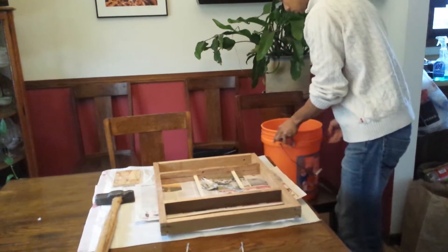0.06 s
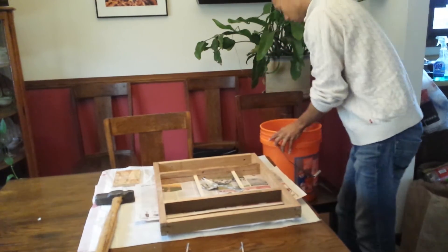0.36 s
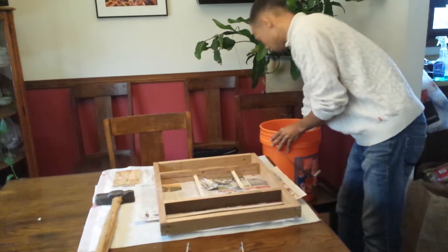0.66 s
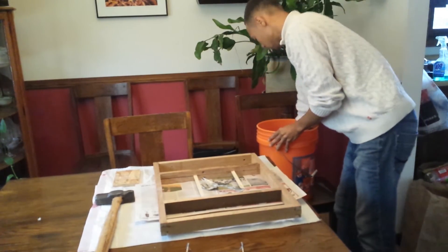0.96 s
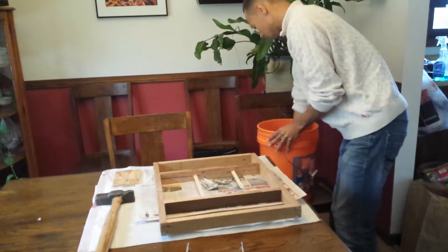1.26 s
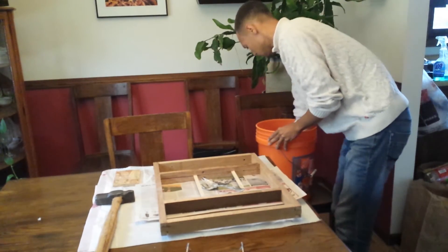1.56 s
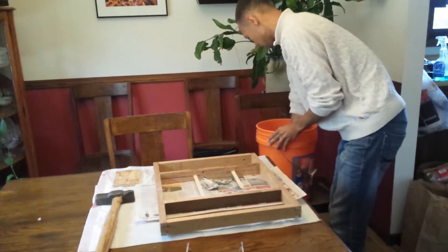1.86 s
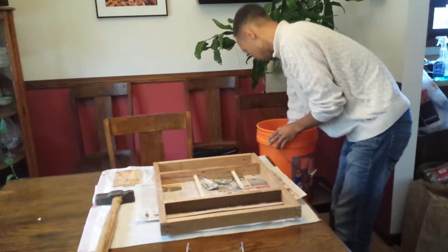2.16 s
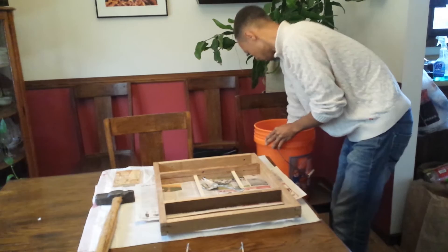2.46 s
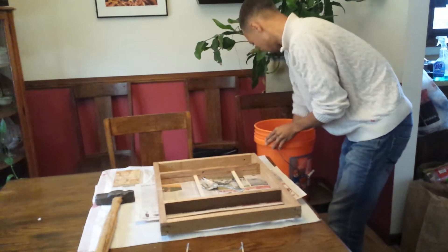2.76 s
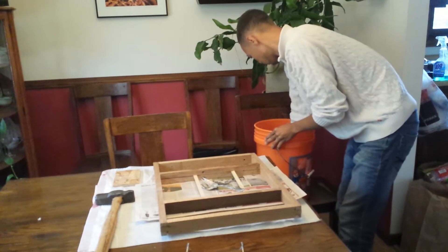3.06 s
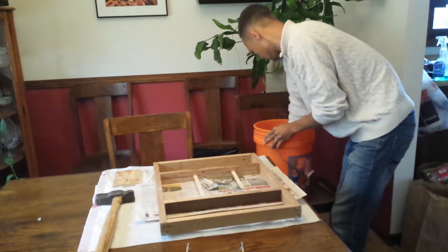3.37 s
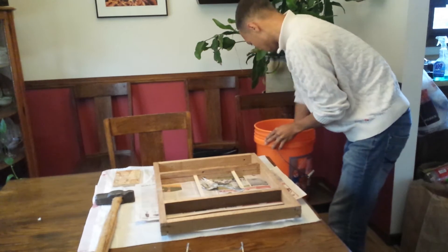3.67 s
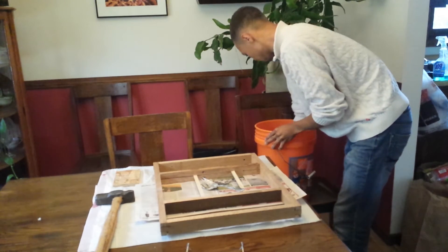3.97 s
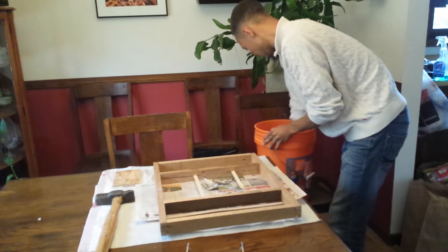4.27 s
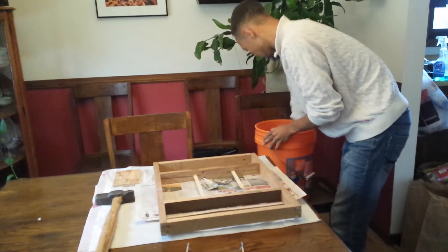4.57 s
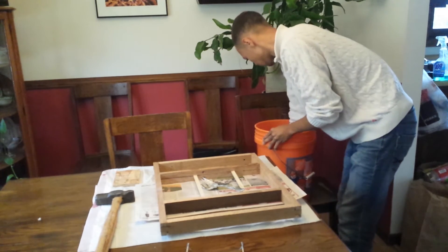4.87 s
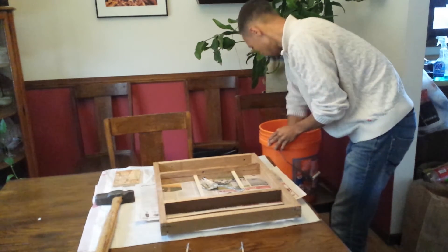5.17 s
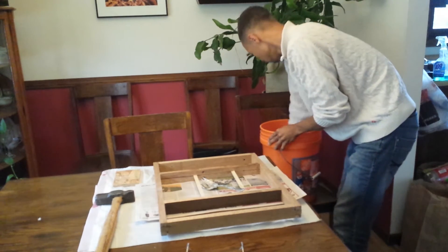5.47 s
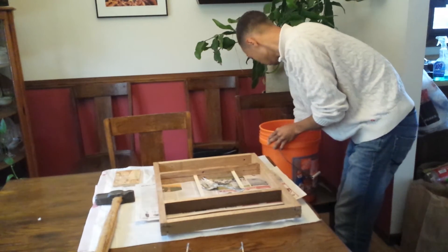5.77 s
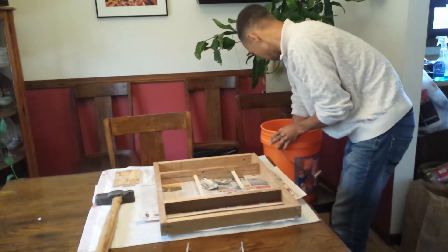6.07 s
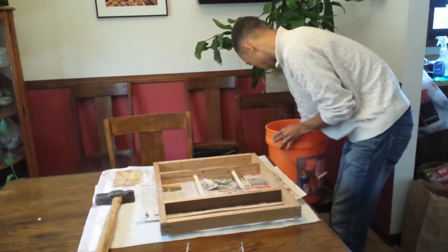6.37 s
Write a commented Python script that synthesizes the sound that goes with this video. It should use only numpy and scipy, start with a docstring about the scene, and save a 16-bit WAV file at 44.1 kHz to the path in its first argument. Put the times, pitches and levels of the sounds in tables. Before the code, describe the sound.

A plastic bucket judders briefly across a surface and lands with a hollow thump, the damp sugar inside slumping. A hand then digs in and sweeps round again and again, making soft gritty hisses, scrapes and small crunches. Now and then the bucket rocks and knocks, more often near the end. It is heard from a few metres away in a quiet room with a slight echo.

```python
"""In a wood-panelled room, a few metres away, damp sugar is mixed by hand in a plastic bucket.
The bucket judders along its seat and is set down; then the hand digs in and sweeps round, again and again.
Thousands of tiny grain clicks blur into a hiss, a scrape or a crunch.
Now and then the bucket rocks and knocks, ringing briefly. The room adds its echo and a faint rumble."""
import sys
import numpy as np
from scipy import signal
from scipy.fft import rfft, irfft
from scipy.io import wavfile
from scipy.ndimage import uniform_filter1d

SR = 44100
rng = np.random.default_rng(int(sys.argv[2]) if len(sys.argv) > 2 else 0)


def put_to_file(sound):
    """Save the sound as 16-bit audio at rate SR, in the file named by the first command-line argument."""
    columns = np.atleast_2d(sound).T  # one column per channel
    safe = np.clip(columns, -1, 1)
    whole_steps = np.round(safe * 32767)
    wavfile.write(sys.argv[1], SR, whole_steps.astype(np.int16))


N = 291501
TIME = np.arange(N) / SR

# the fingers plunge in or crush a clump: t/s, relative level/dB, length/s, treble cutoff/Hz
DIGS = [(0.652, -38, 0.038, 2000), (0.929, -41.5, 0.058, 3220), (1.04, -37, 0.021, 7000),
        (1.379, -46.5, 0.033, 1640), (1.533, -32.5, .03, 1860), (2.299, -30.5, 0.037, 1680),
        (3.057, -37, 0.03, 1690), (3.272, -42, 0.031, 1100), (3.873, -39.5, 0.049, 2320),
        (3.91, -35, 0.014, 1510), (4.057, -44.5, 0.016, 6000), (4.782, -37.5, 0.047, 1600),
        (4.799, -32, 0.028, 2200), (5.649, -34, 0.039, 1297), (5.802, -38, 0.014, 3000),
        (6.336, -34.5, 0.034, 1740)]
# the bright tone of loose, sliding grains: f/Hz, level/dB
HISS_TONE = [(200, -52), (900, -1.5), (2000, 0), (3000, 1.5), (3800, 0), (5500, -0.5), (7400, -2.5),
             (8400, -7), (10000, -15), (13000, -19), (15000, -28)]
# the darker tone of packed grains scraping: f/Hz, level/dB
SCRAPE_TONE = [(60, -8), (110, -10), (145, -3), (220, -1), (420, -1), (650, 1), (900, -1.5), (1300, 3),
               (1750, 2), (2650, -5), (3030, 2.5), (3450, -8.5), (9000, -38)]


def stirring():
    """Each sweep of the hand sets loose grains hissing and drags packed sugar along the wall."""
    slide, press = hand_motion()
    hiss = unit(colour(grains(N, per_s=7000, scatter_db=5, clumps_per_s=70, clump_db=-0.5), HISS_TONE))
    packed = grains(N, per_s=2500, scatter_db=5.5, clumps_per_s=73, clump_db=-0.5)
    scrape = unit(colour(packed, SCRAPE_TONE))
    # grains scratching the plastic make the wall ring at one pitch, even under a light touch
    scratches = grains(N, per_s=3000, scatter_db=4, clumps_per_s=40, clump_db=2)
    wall = unit(resonate(scratches, hz=3040, sharpness=14))
    return undb(3) * slide * hiss + undb(2.5) * press * scrape + undb(-35.5) * np.sqrt(slide) * wall


def hand_motion():
    """How strongly grains slide and packed sugar is pressed: sweeps swell and fade, digs start at once."""
    # strokes through the sugar: t/s, swell/s, fade/s, relative hiss level/dB, relative scrape level/dB
    sweeps = [(0.649, 0.049, 0.16, -46.5, -43), (0.819, 0.11, 0.37, -48, -57),
              (1.129, 0.13, 0.31, -48.5, -46), (1.38, 0.18, .1, -49, -42), (1.57, 0.17, 0.14, -40.5, -40),
              (1.79, 0.12, 0.24, -36.5, -44), (1.98, 0.15, 0.13, -48, -43), (2.33, 0.064, 0.38, -45, -46.5),
              (2.56, 0.15, 0.13, -42, -48.5), (2.749, 0.088, .13, -41.5, -47), (3.16, 0.12, .13, -46, -56),
              (3.341, 0.33, 0.14, -40.5, -58), (3.848, 0.045, 0.33, -44.5, -61),
              (4.08, 0.16, 0.15, -47.5, -53), (4.42, 0.14, 0.8, -55, -53), (4.82, 0.092, 0.32, -44.5, -57),
              (4.98, 0.19, 0.43, -43, -51), (5.42, 0.063, .14, -50, -45), (5.71, 0.086, 0.27, -41.5, -47),
              (5.86, 0.19, 0.21, -41, -48.5), (6.32, 0.084, 0.19, -43, -42.5), (6.47, 0.12, .1, -46.5, -41)]
    hand_in_s, idle_hiss_db, idle_scrape_db = 0.88, -60.5, -57.5  # once in, the hand never quite rests
    moves = [(TIME >= hand_in_s, idle_hiss_db, idle_scrape_db)]
    for start, rise, fall, hiss_db, scrape_db in sweeps:
        progress = np.interp(TIME, [start, start + rise, start + rise + fall], [0, 1, 2])
        speed = np.abs(np.sin(np.pi / 2 * progress)) ** 1.64  # a power above 1 starts and stops gently
        moves.append((speed, hiss_db, scrape_db))
    for start, db, _, _ in DIGS:
        spray = (TIME >= start) * np.exp(-np.abs(TIME - start) / 0.044)
        moves.append((spray, db - 10, db - 8))  # each dig sets off a little hiss and scrape
    slide = np.sqrt(sum((shape * undb(hiss_db)) ** 2 for shape, hiss_db, _ in moves))
    press = np.sqrt(sum((shape * undb(scrape_db)) ** 2 for shape, _, scrape_db in moves))
    return slide, press


def grains(n, per_s, scatter_db, clumps_per_s, clump_db):
    """Crystals slip one by one, mostly with small clicks; damp clumps give way in bunches."""
    slips = rng.random(n) < per_s / SR
    sizes = rng.standard_normal(n) * undb(scatter_db * np.minimum(rng.exponential(size=n), 5))
    return slips * sizes * undb(clump_db * wander(n, clumps_per_s))


def digging():
    """The fingers break into the heap, with one crunch for each dig."""
    out = np.zeros(N)
    for start, db, length, bright_hz in DIGS:
        add(out, start, undb(db) * crunch(length, bright_hz))
    return out


def crunch(length, bright_hz):
    """Packed sugar cracks, then collapses in a rush of grains; the bucket's hollow colours the sound."""
    # the tone of a breaking clump: f/Hz, level/dB
    crunch_tone = [(50, -24), (150, 7), (300, 0.5), (600, 3), (900, 5), (1250, 5.5), (1700, 4.5), (2400, 2),
                   (3100, 1.5), (5000, -10.5), (8000, -20), (14000, -36)]
    t = TIME[:SR // 4]
    slips = colour(grains(len(t), per_s=5000, scatter_db=1.5, clumps_per_s=380, clump_db=1), crunch_tone)
    hollow = resonate(slips, hz=870, sharpness=9) + resonate(slips, hz=1700, sharpness=12)
    crack = undb(-5.5) * np.exp(-t / 0.0089)
    collapse = np.exp(-(t / length) ** 4.6)  # holds, then drops away fast
    return undb(-2) * unit(soften(slips + undb(-5) * hollow, bright_hz)) * (crack + collapse)


def knocking():
    """Each blow rings the bucket and the room and jolts the sugar; returns the rings and the crunches."""
    # the bucket knocks on its seat: t/s, level/dB, treble cutoff/Hz (higher for a harder contact)
    knocks = [(.198, -34.5, 500), (0.2451, -14.5, 470), (.275, -22, 1200), (.296, -21.5, 500),
              (.304, -20, 950), (.328, -29.5, 307), (.859, -47, 220), (.901, -50, 128.1), (0.98, -46, 260),
              (1.537, -38.5, 601), (1.801, -40, 186), (2.071, -38, 302), (2.3, -38.5, 1600),
              (2.754, -49.5, 260), (3.655, -29, 410), (3.691, -41, 382), (4.267, -46.5, 300),
              (4.796, -39, 500), (5.066, -36.5, 280), (5.360, -27, 720), (5.448, -25, 484),
              (5.499, -35.5, 400), (5.795, -37, 222), (6.104, -28, 674), (6.163, -33.5, 242),
              (6.546, -39.5, 330)]
    # tones a knock sets ringing: the bucket's own, plus the room's low standing waves (63, 141, 341 Hz)
    # f/Hz, relative level/dB, time to fade 60 dB before ring_scale/s
    knock_tones = [(63.4, -13, 0.12), (89.5, -32, 0.2), (141.4, -19.5, 0.5), (195.7, -4, 0.11),
                   (222.2, 4.5, 0.057), (287, 0, 0.035), (316, -8, 0.09), (341.2, -8.5, 0.17),
                   (405, 6.5, 0.016), (515.3, -12.5, 0.14), (553, -8.5, 0.035), (611, -8, 0.12),
                   (681, -4.5, 0.075), (785, -9.5, 0.081), (864, -5.5, 0.082), (970, -7, 0.039),
                   (1053, -1.5, 0.064), (1102, -5.5, 0.079), (1242, -8, 0.047)]
    ring_scale, wall_rise_s = 0.73, 0.0038  # every ring is shortened; the wall is slow to start
    t = TIME[:SR * 2 // 5]
    rings, jolts = np.zeros((2, N)), np.zeros(N)
    hz, tone_db, ring_s = np.transpose(knock_tones)[:, :, None]
    fades = undb(tone_db) * np.exp(-np.log(1000) * t / (ring_s * ring_scale))
    for start, db, hard_hz in knocks:
        # the load and the grip shift, so each blow sounds a little different
        detune, share = rng.standard_normal((2, len(knock_tones), 1))
        tones = fades * undb(0.9 * share) * np.sin(2 * np.pi * hz * (1 + 0.0071 * detune) * t)
        ring = tones[::2].sum(0) - tones[1::2].sum(0)  # neighbouring tones swing opposite ways
        ring *= 1 - np.exp(-t / wall_rise_s)
        ring = soften(cut_bass(ring, 78), hard_hz)  # a small body gives off little deep bass
        echo = signal.fftconvolve(ring[None], reflections(decay_scale=0.7), axes=1)[:, :len(t)]
        heard = ring + undb(2) * echo
        add(rings, start, undb(db) * heard / heard[:, :SR // 30].std())  # the first 1/30 s sets the level
        add(jolts, start, undb(db - 11) * crunch(length=0.013, bright_hz=9000))
    return rings, jolts


def dragging():
    """The bucket is shoved into place, and later skids a little after two of the harder knocks."""
    # the foot sticks and slips: t/s, length/s, judder rate/Hz, judder level/dB, relative grit level/dB
    skids = [(0, 0.051, 340.5, -24, -38.5), (.05, 0.085, 370, -28.5, -43), (.135, .12, 372, -31, -41),
             (3.728, 0.051, 336, -40, -66), (5.512, 0.0687, 346.7, -35, -60)]
    out = np.zeros(N)
    for start, length, rate_hz, db, grit_db in skids:
        add(out, start, skid(length, rate_hz, db, grit_db))
    return out


def skid(length, rate_hz, db, grit_db):
    """The foot of the bucket judders unevenly as it slides; grit scrapes under it and the load shifts."""
    ramp_s, rise_hz_per_s = 0.0047, 126  # a skid takes hold and lets go; it speeds up on the way
    n = int(length * SR)
    t = TIME[:n]
    hz = rate_hz + rise_hz_per_s * (t - length / 2)
    phase = 2 * np.pi * np.cumsum(hz * (1 + .04 * wander(n, per_s=150))) / SR
    judder = np.sin(phase) * undb(db + 2.8 * wander(n, per_s=110))
    # sharper slips add overtones as the grit bites
    overtones = undb(-10) * np.sin(2 * phase) + undb(0.5) * np.sin(3 * phase)
    grit_clicks = grains(n, per_s=3000, scatter_db=3, clumps_per_s=110, clump_db=1.5)
    grit = unit(soften(colour(grit_clicks, SCRAPE_TONE), 1500))
    rumble = unit(soften(colour(rng.standard_normal(n), SCRAPE_TONE), 470))
    load = unit(colour(grains(n, per_s=6000, scatter_db=1.5, clumps_per_s=80, clump_db=1.5), HISS_TONE))
    rough = overtones + undb(-1) * grit + undb(6.5) * rumble + undb(-2.5) * load
    fade_in_out = np.sqrt(np.clip(np.minimum(t, length - t) / ramp_s, 0, 1))
    return (judder + rough * undb(grit_db)) * fade_in_out


def slumping(start):
    """The heap collapses as the bucket lands; thrown crystals patter on the wall a moment later."""
    t = TIME[:SR // 4]
    out = np.zeros(N)
    add(out, start, undb(-23) * crunch(length=0.056, bright_hz=10000))
    patter = unit(grains(len(t), per_s=4000, scatter_db=3, clumps_per_s=200, clump_db=1.5))
    add(out, start + .008, undb(-41) * patter * np.exp(-t / .05))
    return out


def settling(start):
    """Loose sugar trickles to rest after the bucket is set down."""
    t = TIME[:SR // 2]
    out = np.zeros(N)
    trickle = grains(len(t), per_s=4000, scatter_db=1.5, clumps_per_s=60, clump_db=1.5)
    add(out, start, undb(-35) * unit(colour(trickle, HISS_TONE)) * np.exp(-t / 0.11))
    return out


def room(x, direct_db, echo_db, decay_scale, spots):
    """Sound leaves from one or more spots round the bucket by turns, each with its own reflections."""
    active_spot = np.arange(N) // (SR // 60) % spots  # 60 turns a second
    echo = 0
    for spot in range(spots):
        share = np.sqrt(np.abs(uniform_filter1d(1. * (active_spot == spot), size=300)))  # smooth handover
        echo = echo + signal.oaconvolve((x * share)[None], reflections(decay_scale), axes=1)[:, :N]
    return undb(direct_db) * x + undb(echo_db) * echo


def reflections(decay_scale):
    """Many echoes blur into a fading tail of noise, whose bass is alike on the left and right."""
    # the room's echo: f/Hz, time to fade 60 dB before decay_scale/s, left-right likeness (0 to 1)
    echo_bands = [(60, 0.68, 0.67), (143, 0.34, 1), (280, 0.56, 0.77), (600, 0.57, 0.64), (1140, 0.64, 0),
                  (3000, 0.48, 0.06), (7000, 0.47, 0.15), (14000, 0.33, 0)]
    t = TIME[:SR * 2 // 5]
    log_hz = np.log(np.arange(len(t) // 2 + 1) * SR / len(t) + 1)
    hz, fade_s, likeness = np.transpose(echo_bands)
    noise, tail = rfft(rng.standard_normal((2, len(t)))), 0
    for band, decay_s, alike in zip(np.eye(len(hz)), fade_s * decay_scale, np.clip(likeness, 0, .99)):
        shared, side = irfft(noise * np.interp(log_hz, np.log(hz), band), len(t))
        pair = np.sqrt((1 + alike) / 2) * shared + np.sqrt((1 - alike) / 2) * np.array([side, -side])
        fade = np.exp(-np.log(1000) * t / decay_s) * (t > .003)  # the first echo takes 3 ms
        tail = tail + pair * fade / np.linalg.norm(fade)
    return tail


def air():
    """Quiet room noise: left and right share the rumble, but each has its own faint hiss."""
    # the tone of the quiet room: f/Hz, level/dB
    air_tone = [(25, -43), (45, -9), (70, 6.5), (100, -5), (150, 2), (300, -5), (700, -16), (2000, -15),
                (7000, -19), (14000, -31)]
    rumble = soften(rng.standard_normal(N), 560)
    hisses = cut_bass(rng.standard_normal((2, N)), 500)
    return undb(-57) * unit(np.array([colour(rumble + hiss, air_tone) for hiss in hisses]))


def undb(db):
    """Turn decibels into a number to multiply by."""
    return 10 ** (np.asarray(db) / 20)


def unit(x):
    """Scale a sound to an average (rms) level of 1."""
    return x / np.sqrt(np.mean(x ** 2) + 1e-20)


def add(out, start, x):
    """Mix a short sound in at its start time, in seconds."""
    i = max(int(start * SR), 0)
    out[..., i:i + x.shape[-1]] += x[..., :max(N - i, 0)]


def wander(n, per_s):
    """A random wobble of size about 1 that heads for a new value per_s times a second."""
    steps = np.arange(n) / SR * per_s
    return 1.2 * np.interp(steps, np.arange(n // 40), rng.standard_normal(n // 40))


def colour(x, points, size=2048):
    """Shape a sound's tone to follow a curve through points of f/Hz, level/dB."""
    hz, db = np.transpose(points)
    gain = undb(np.interp(np.log(np.arange(size // 2 + 1) * SR / size + 1), np.log(hz), db))
    # fold the filter forward in time, so nothing rings before the sound that causes it
    cepstrum = irfft(np.log(gain))
    cepstrum[1:size // 2] *= 2
    cepstrum[size // 2 + 1:] = 0
    return signal.fftconvolve(x, irfft(np.exp(rfft(cepstrum))))[:len(x)]


def resonate(x, hz, sharpness):
    """Keep a narrow band round hz; the sharper it is, the longer it rings."""
    return signal.lfilter(*signal.iirpeak(hz, sharpness, fs=SR), x)


def soften(x, hz):
    """Turn down the treble above hz, as a softer contact does."""
    return signal.sosfilt(signal.butter(2, min(hz, .45 * SR), fs=SR, output="sos"), x)


def cut_bass(x, hz):
    """Turn down the bass below hz."""
    return signal.sosfilt(signal.butter(2, hz, "highpass", fs=SR, output="sos"), x)


def scene():
    """The sugar and the bucket in the room, over its quiet air."""
    set_down_s = .246
    knocks, jolts = knocking()
    sliding = stirring() + settling(set_down_s)
    sugar = room(sliding, direct_db=-12, echo_db=-0.34, decay_scale=0.58, spots=6)
    breaking = digging() + slumping(set_down_s) + jolts
    crunches = room(breaking, direct_db=-6, echo_db=0, decay_scale=0.84, spots=2)
    drag = room(dragging(), direct_db=-4, echo_db=-4.5, decay_scale=0.86, spots=1)
    return sugar + crunches + drag + knocks + air()


def record(dry):
    """The microphone's two openings each have their own tone; the highest treble is cut steeply."""
    # how much louder the left opening is than the right: f/Hz, level/dB
    balance = [(100, 2), (1000, 1.5), (2000, 2.5), (3000, 3), (4200, 4.5), (5400, 3.5), (7200, -13.5),
               (9000, -10), (14000, -6.5)]
    top_hz = 14900
    sides = [colour(x, np.array(balance) * [1, half]) for x, half in zip(dry, (.5, -.5))]
    return signal.sosfilt(signal.ellip(10, .2, 80, top_hz, fs=SR, output="sos"), sides)


dry = scene()
out = record(dry)
put_to_file(out)
```